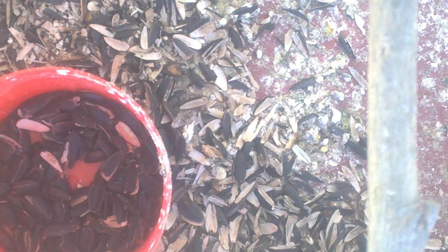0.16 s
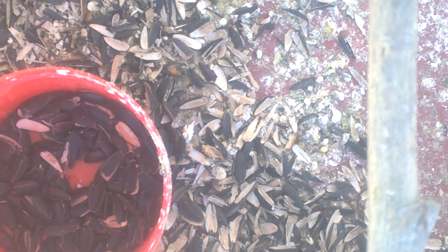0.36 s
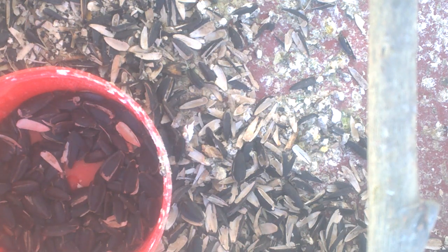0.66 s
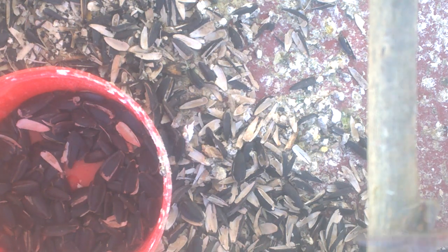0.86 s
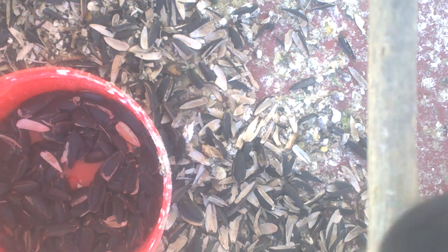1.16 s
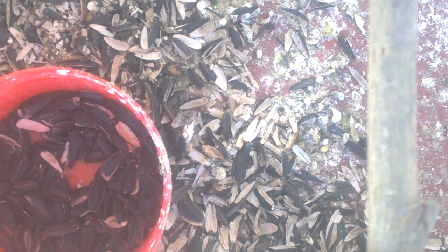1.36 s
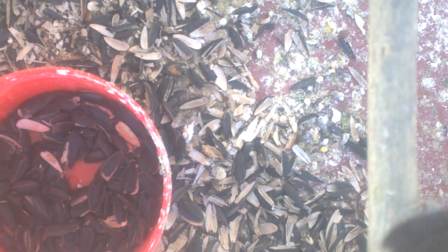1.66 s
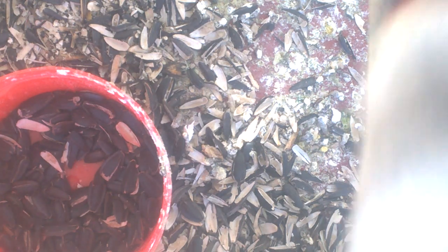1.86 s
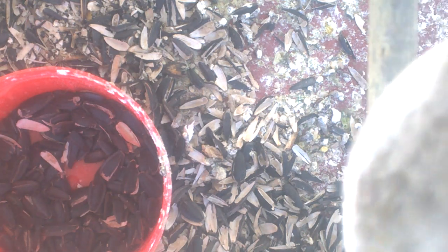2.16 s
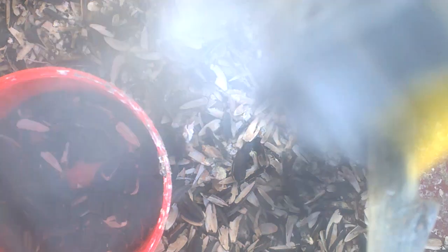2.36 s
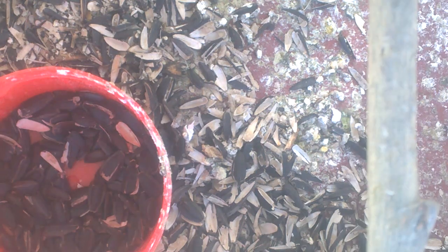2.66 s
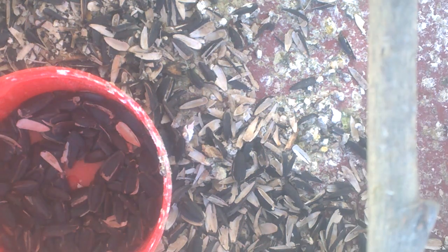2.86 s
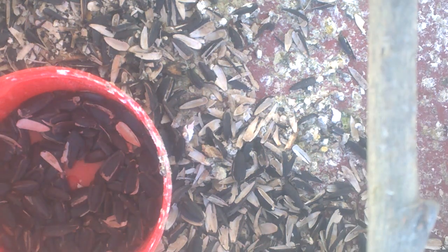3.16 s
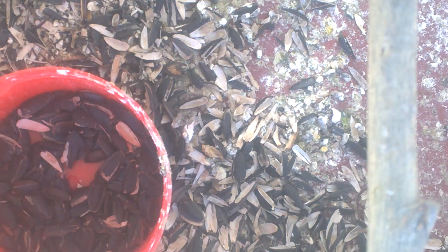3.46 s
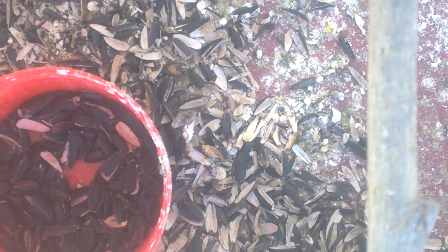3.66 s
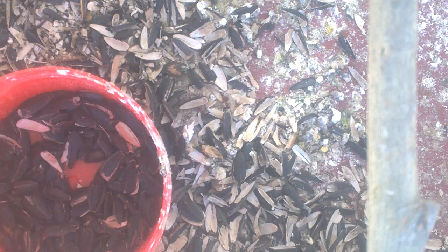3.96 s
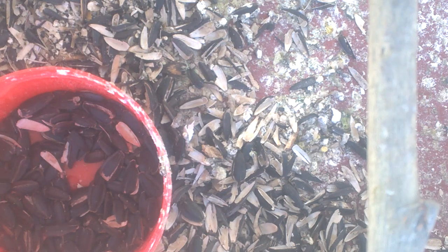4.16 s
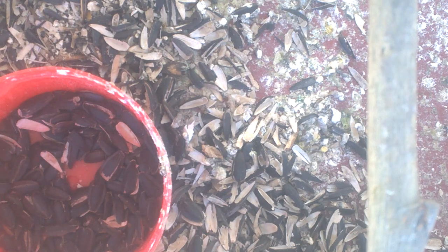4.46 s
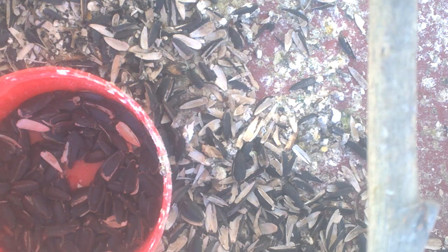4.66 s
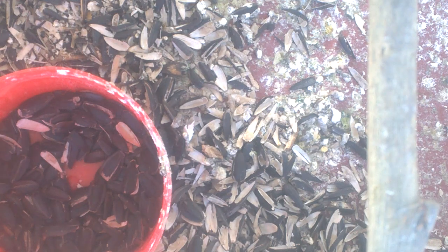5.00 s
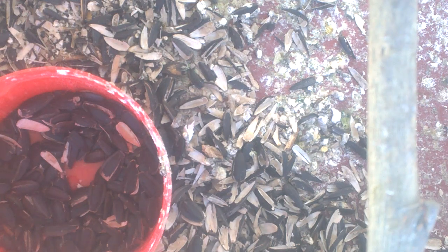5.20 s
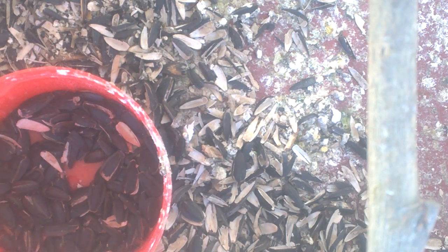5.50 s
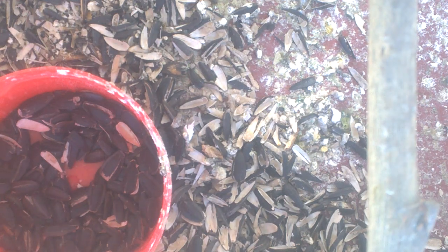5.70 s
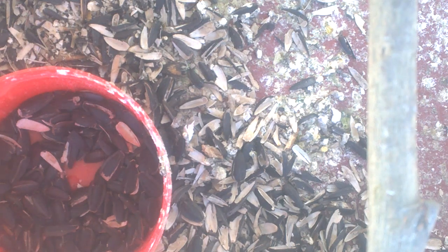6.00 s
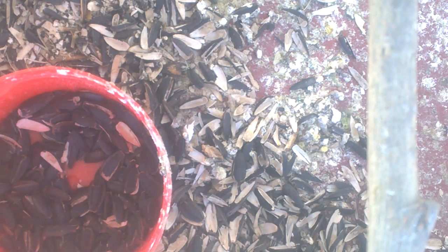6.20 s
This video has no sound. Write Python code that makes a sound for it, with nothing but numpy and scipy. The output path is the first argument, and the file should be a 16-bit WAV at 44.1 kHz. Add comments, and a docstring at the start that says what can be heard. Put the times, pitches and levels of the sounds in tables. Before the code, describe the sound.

Close outdoor sound from a microphone in a feeder: irregular hard taps, scratchy claw contacts and a few wing beats ring the boards, with short gaps between clusters. Low wind buffeting comes and goes, strongest at the start and in a burst of thumps near the end. A distant farm animal bleats first and again at the cut-off. Three very short, high chirps pierce the soft air.

```python
"""A microphone inside a wooden bird feeder on a farm, with soft air and a faint thin tone behind everything.
At once a farm animal bleats some way off: vocal-fold pulses and swelling breath noise through a throat.
Wind buffets the microphone from the start, again and again: noise rumble, flutter and pressure dips for eddies.
From 0.3 s small birds hop, peck and beat their wings close by: contacts ring the boards. A bird chirps a rising
whistle after one second and near 2.5 s; strong eddies come near 5.8 s, a second bleat and third chirp at 6.1 s."""
import sys
import numpy as np
from scipy import signal
from scipy.fft import rfft, irfft
from scipy.io import wavfile

SR = 44100
rng = np.random.default_rng(int(sys.argv[2]) if len(sys.argv) > 2 else 0)


def unload_wav(signal):
    """Save mono or channel-first audio to the path in sys.argv[1] as 16-bit WAV at rate SR, clipped to [-1, 1]."""
    wavfile.write(
        sys.argv[1],
        SR,
        np.round(np.clip(np.atleast_2d(signal).T, -1, 1) * 32767).astype(np.int16),
    )


N = 279594
TIME = np.arange(N) / SR


def amp(db):
    """Decibels to gain."""
    return 10 ** (np.asarray(db) / 20)


def rms_one(x):
    """Scale to unit rms."""
    return x / np.sqrt(np.mean(x ** 2) + 1e-20)


def columns(rows, t):
    """Join the table columns by straight lines, read at the times t."""
    start, *rest = np.transpose(rows)
    return [np.interp(t, start, column) for column in rest]


def drift(rate_hz, size):
    """Random wandering of unit rms: white noise through a double-pole low-pass."""
    r = np.exp(-2 * np.pi * rate_hz / SR)
    settle = 20000   # samples dropped while the filter settles
    noise = rng.standard_normal(size + settle)
    return rms_one(signal.lfilter([1], [1, -2 * r, r * r], noise)[settle:])


def resonate(x, hz, width_hz):
    """Two-pole resonance, gain about 1 at its peak."""
    r = np.exp(-np.pi * width_hz / SR)
    zeros = np.array([1, 0, -1]) * (1 - r * r) / 2
    poles = [1, -2 * r * np.cos(2 * np.pi * hz / SR), r * r]
    return signal.lfilter(zeros, poles, x)


def coloured(spectrum):
    """Unit-rms noise whose spectrum follows the table, joined along log frequency."""
    hz = np.maximum(np.fft.rfftfreq(N, 1 / SR), 1)
    table_hz, table_db = np.transpose(spectrum)
    gain = amp(np.interp(np.log(hz), np.log(table_hz), table_db))
    return rms_one(irfft(rfft(rng.standard_normal(N)) * gain, N))


# spectrum of the open air around the feeder: frequency_hz [Hz], density_db [dB per Hz, relative]
AIR_SPECTRUM = [(71, -35), (120, -2.5), (235, 0), (398, -3.5), (530, -11.5), (649, -11), (719, -10),
                (1320, -13), (2160, -21.5), (3890, -21.5), (5610, -23), (7450, -29), (15500, -27)]
AIR_DB = -68   # rms level


def air():
    """The soft steady air of the place: noise shaped by its spectrum."""
    return amp(AIR_DB) * coloured(AIR_SPECTRUM)


# faint thin tone: start_s [s], pitch_hz [Hz], level_db [dB rms]
FAINT_TONE = [(0, 649.5, -74.5), (1.5, 658.3, -76), (4, 641, -79.5), (4.6, 655.6, -83), (6.34, 642, -86)]


def faint_tone():
    """A thin sine that slides slowly in pitch and wavers slightly in level."""
    pitch_hz, level_db = columns(FAINT_TONE, TIME)
    phase = 2 * np.pi * np.cumsum(pitch_hz) / SR
    return np.sqrt(2) * amp(level_db + 0.25 * drift(11, N)) * np.sin(phase)


# rise and fall of the wind at the microphone: start_s [s], rumble_db [dB, before the lumps]
WIND_LEVEL = [(0.0, -35.5), (0.56, -50), (0.88, -41), (1.08, -60), (1.34, -46), (1.6, -55), (1.91, -48.5),
              (2.17, -47.5), (2.42, -63.5), (2.9, -49.5), (3.25, -60.5), (3.62, -55), (3.89, -48),
              (4.31, -47.5), (4.5, -54), (4.96, -48), (5.35, -59), (6.34, -58)]
# spectrum of the wind rumble: frequency_hz [Hz], density_db [dB per Hz, relative]
RUMBLE_SPECTRUM = [(15, 9), (30, 9), (50, 7), (80, -3), (120, -13.5), (200, -61.5)]
FLUTTER_DB, FLUTTER_FOLLOWS = -68.5, 0.24   # level at mean rumble; share of the rumble's dB swing


def wind():
    """Turbulent air on the microphone: deep rumble and a faster flutter, both made lumpy."""
    rumble_db, = columns(WIND_LEVEL, TIME)
    flutter_db = FLUTTER_DB + FLUTTER_FOLLOWS * (rumble_db - rumble_db.mean())
    rumble = coloured(RUMBLE_SPECTRUM)
    flutter = resonate(rng.standard_normal(N), 110, 110)
    flutter = rms_one(resonate(flutter, 110, 200))
    lumps = amp(1.7 * drift(31.5, N))
    return lumps * (amp(rumble_db) * rumble + amp(flutter_db) * flutter)


# strong eddies at the microphone: centre_s [s], depth_db [dB, scale of the dip], width_ms [ms, time scale]
EDDIES = [(0.113, -37, 13), (0.206, -36, 3.2), (0.287, -42, 9.9), (0.467, -26.5, 9.5), (0.485, -31, 14),
          (0.505, -29.5, 10.5), (0.556, -27.5, 6.5), (0.909, -26, 15.3), (0.985, -39, 4),
          (1.009, -30.5, 11.7), (1.405, -38, 8.3), (1.741, -36.5, 15.5), (1.851, -29.5, 3.7),
          (1.866, -32, 4), (1.885, -34, 15.5), (1.919, -37, 2.2), (1.931, -31.5, 8), (1.954, -33, 6.3),
          (2.461, -24.5, 10.1), (2.743, -37.5, 14), (2.957, -37.5, 16.6), (3.495, -26, 10.4),
          (4.091, -40.5, 13.6), (4.156, -36, 4.8), (4.223, -39, 4.4), (4.296, -33.5, 8.7),
          (4.324, -32, 7.3), (4.35, -36, 10), (4.956, -36.5, 10.5), (5.01, -36, 11), (5.732, -20.5, 10.9),
          (5.775, -21.5, 12), (5.817, -21, 13), (5.861, -17, 9.5)]
TEAR_DB, TEAR_DB_PER_MS = -28.5, -0.51   # tearing against depth: narrow eddies tear more


def eddies():
    """Each strong eddy is a pressure dip with a swell before and after, and a little tearing noise."""
    out = np.zeros(N)
    tearing = resonate(rng.standard_normal(N), 135, 270)
    tearing = rms_one(resonate(tearing, 120, 280))
    for centre_s, depth_db, width_ms in EDDIES:
        u = (TIME - centre_s) / (width_ms / 1000)   # time in eddy widths
        pressure = -np.exp(-(u / 0.4) ** 2)
        pressure += 0.52 * np.exp(-((u + 1.0) / 0.51) ** 2)   # swell before
        pressure += 0.55 * np.exp(-((u - 1.4) / 0.8) ** 2)   # swell after
        tear_gain = amp(TEAR_DB + TEAR_DB_PER_MS * width_ms)
        out += amp(depth_db) * (pressure + tear_gain * tearing * np.exp(-(u / 2.0) ** 2))
    return out


def add(out, start_s, x):
    """Mix x in at start_s, cut at the end of the scene."""
    i = round(start_s * SR)
    out[i:i + len(x)] += x[:N - i]


# one list per bleat: start_s [s], pitch_hz [Hz], level_db [dB, upper throat], noise_share [0-1]
BLEATS = [
    [(0.004, 114.7, -63, .5), (0.06, 126.2, -61, 0.7), (0.148, 135.4, -54, 0.23), (0.24, 144.7, -52.5, 0.4),
     (0.43, 148.6, -53.5, 0.46), (0.55, 145.3, -52, 0.03), (0.6, 141.7, -52.5, 0.2),
     (0.675, 146.5, -54.5, 0.39), (0.72, 141, -57, 0.5), (0.77, 140.5, -73, 0.53)],
    [(6.1, 117.8, -92, 1), (6.14, 125.2, -65, 0.94), (6.196, 130.9, -55.5, 0.12), (6.26, 134, -55, 0),
     (6.295, 142, -53, 0.3), (6.34, 145.7, -50, 0.15)],
]
# lower throat resonances of each bleat: level_db [dB against the bleat's level]
LOW_THROAT_DB = [-5, 1]
# throat resonances, low to high: frequency_hz [Hz], width_hz [Hz, first pass], level_db [dB, within its group]
THROAT = [(326, 205, -9), (611, 118, 0), (937, 220, 1), (1334, 200, 4.5), (1500, 210, 6), (1812, 124, 5.5),
          (2200, 260, -13)]
FUNDAMENTAL_DB = -1   # rms against the bleat's level
# the mouth opens as the pitch climbs and lets the top resonances out
OPEN_HZ, TOP_DB, TOP_DB_PER_HZ = 151, 1, 0.57   # at OPEN_HZ their extra gain is TOP_DB


def bleat(rows, low_db):
    """Vocal-fold pulses plus breath noise that swells slightly each cycle, through the throat; a clean fundamental."""
    t = np.arange(rows[0][0], rows[-1][0], 1 / SR)
    pitch_hz, level_db, noise_share = columns(rows, t)
    noise_share = np.clip(noise_share, 0, 1)
    unsteady_hz = pitch_hz * (1 + 0.01 * drift(33, len(t)))
    phase = 2 * np.pi * np.cumsum(unsteady_hz) / SR
    # each partial fades in and out on its own on the way through moving air
    pulses = sum(amp(3.2 * drift(12, len(t))) * np.cos(k * phase) for k in range(2, 20))
    breath = rng.standard_normal(len(t)) * (1 + 0.22 * np.cos(phase))
    breath = signal.sosfilt(signal.butter(2, 2800, fs=SR, output="sos"), breath)
    source = np.sqrt(1 - noise_share) * rms_one(pulses) + np.sqrt(noise_share) * rms_one(breath)

    bands = []
    for hz, width_hz, band_db in THROAT:
        band = resonate(resonate(source, hz, width_hz), hz, 1.37 * width_hz)
        bands.append(amp(band_db) * band)
    low = rms_one(bands[0] + bands[1])
    top_gain = amp(TOP_DB + TOP_DB_PER_HZ * (pitch_hz - OPEN_HZ))
    high = rms_one(bands[2] - bands[3] + bands[4] - top_gain * (bands[5] - bands[6]))
    fundamental = amp(FUNDAMENTAL_DB) * np.sqrt(2) * np.sin(phase)
    fade = np.clip(np.minimum(t - t[0] + 0.009, t[-1] - t + 0.011) / 0.023, 0, 1)
    return fade * amp(level_db) * (high + amp(low_db) * low + fundamental)


def bleats():
    """The farm animal's two bleats, each at its own time."""
    out = np.zeros(N)
    for rows, low_db in zip(BLEATS, LOW_THROAT_DB):
        add(out, rows[0][0], bleat(rows, low_db))
    return out


# chirps of the bird: start_s [s], peak_db [dB, before the waver], pitch_factor [ratio]
CHIRPS = [(1.052, -39.5, 1.0), (2.4855, -37, 1.015), (6.121, -41.5, 1.012)]
# course of one chirp: time_ms [ms], pitch_hz [Hz, before pitch_factor], level_db [dB against the peak]
CHIRP_SHAPE = [(0, 2400, -28), (2, 2900, -21), (5, 3330, -14), (7.5, 3700, 0), (10, 4200, -3),
               (12.5, 4530, -7), (17.5, 4500, -13), (19, 4450, -35)]
# second and third partial of the whistle: level_db [dB against the first]
OVERTONES_DB = [-30, -38]
# faint blurred tail just after each chirp: delay_ms [ms], level_db [dB against the chirp, before the wander]
CHIRP_TAIL = [(11, -30), (17, -31), (24, -33), (33, -36)]


def chirps():
    """A rising whistle with weak overtones; faint copies, wandering in strength and sign, blur into a tail."""
    out = np.zeros(N)
    t = TIME[:int(CHIRP_SHAPE[-1][0] * SR / 1000)]
    pitch_hz, shape_db = columns(CHIRP_SHAPE, t * 1000)
    for start_s, peak_db, pitch_factor in CHIRPS:
        phase = 2 * np.pi * np.cumsum(pitch_hz * pitch_factor) / SR
        whistle = np.sin(phase)
        for partial, overtone_db in enumerate(OVERTONES_DB, start=2):
            whistle += amp(overtone_db) * np.sin(partial * phase)
        whistle *= amp(peak_db + shape_db + 1.6 * drift(130, len(t)))
        add(out, start_s, whistle)
        for delay_ms, tail_db in CHIRP_TAIL:
            add(out, start_s + delay_ms / 1000, whistle * amp(tail_db) * drift(270, len(t)))
    return out


BLOW = 16.3   # first contact, against the rms of the rattle before its swings


def rattle(size):
    """One sharp push, then small random contacts over noise, swinging unevenly in level."""
    contacts = (rng.random(size) < 700 / SR) * rng.uniform(-1, 1, size)   # about 700 a second
    rough = rms_one(rms_one(contacts) + 0.58 * rng.standard_normal(size))
    drive = rough * amp(1.82 * drift(50, size))
    drive[0] = BLOW
    return drive


# claws, beaks and a few wing beats at the boards, close by: start_s [s], level_db [dB, drives the floor],
# then against level_db: thud_db [dB], box_db [dB], hardness_db [dB, drives the wall], rim_db [dB]
KNOCKS = [(0.324, -54.5, -1.5, -8, -9, -15), (0.477, -56, -21, -16, -11, -13),
          (0.722, -54, -2.5, -6.5, -7, -8.5), (0.895, -81.5, 16, 0, 13, 5),
          (0.95, -53, 2.5, -7, -11.5, -11.5), (0.964, -43.5, -6, -12, -15, -27),
          (0.984, -52.5, -25, 3.5, -14, -16), (1.13, -64, -11, -10, -6, -13), (1.152, -65, 7, -8, -11, -30),
          (1.203, -50.5, -20, 1, -9, -15), (1.225, -56.5, -20, -6, -7, -23), (1.324, -65, -5, 6, 0.5, -3.5),
          (1.433, -58.5, -10, 2, -4, -5), (1.463, -62.5, -5, 5, -1, 0), (2.269, -65, -25, -8.5, -7, -17),
          (2.356, -55, -9, 4.5, -1, -3.5), (2.434, -57.5, 6.5, -18, -6, -8),
          (2.448, -54, -8.5, -14, -5, -8.5), (2.715, -53.5, -1, -10, -5, -6.5),
          (2.858, -56, 0.5, -13, -8.5, -17), (2.909, -60.5, 1.5, -11, -10, -29),
          (2.95, -64, -12, -13, -8, -24), (3.397, -65.5, -1, -4, -10, -14), (3.481, -78, 1, 7, 2, -5),
          (4.098, -54.5, -12.5, -12, -20, -14), (4.114, -54, -22, -12, -5.5, -6.5),
          (4.3, -53.5, -1, 0, -5.5, -10.5), (4.33, -51.5, -17, -2, -22, -20),
          (4.354, -54.5, -7, 0, -17, -20), (4.465, -59.5, -4, 3, -3, -11.5),
          (4.489, -54, -16, -5, -16, -19), (4.567, -51.5, -6, -1.5, -0.5, -7),
          (4.61, -53.5, -11, 1, -3, -5.5), (4.707, -58, -31, 0, -0.5, -9), (5.12, -59, -0.5, -7, -10, -16),
          (5.619, -61.5, -5.5, -3, -5.5, -19), (5.65, -63, -12, -11, -16, -26),
          (5.725, -58, -15, 1, -0.5, -5), (5.736, -64.5, 1, -1.5, 4, -1),
          (5.837, -50.5, -1, -18, -5.5, -7.5), (5.85, -50, -7, -16, -4, -12.5),
          (5.876, -56.5, -9, -14, -7, -18), (5.969, -77, 18.5, 4, -0.5, 8),
          (6.102, -55.5, -7, -13, -6, -16), (6.129, -53, -6, -13, -16, -26)]
# resonances, one list each for thud, box, floor, wall, rim and crack:
# frequency_hz [Hz], width_hz [Hz, first pass], level_db [dB, before a random spread]
BOARDS = [
    [(232.5, 55, -5.5)],
    [(358.3, 75, -5.5), (455, 38, -10)],
    [(672, 83, -15.5), (877.4, 63, -8), (970, 91, -7.5), (1124, 113, -11)],
    [(1249, 84, -8.5), (1308, 190, -8.5)],
    [(1897, 100, -13.5), (2085, 180, -7.5), (2540, 490, -12)],
    [(3670, 700, -3.5), (4930, 1600, -5), (8800, 6000, -11)],
]
RATTLE_S, KNOCK_T60_S = 0.011, 0.16   # hold, then fall by 60 dB, both at 1 kHz
TAIL_DB, TAIL_T60_S = -18, 0.74   # the boards shiver on faintly; T60 at 1 kHz
CRACK_DB, CRACK_FOLLOWS = -16.5, 1.28   # crack at hardness 0 dB; dB of crack per dB of hardness


def knocks():
    """A blow and the uneven rattle after it drive the board resonances; higher ones die sooner."""
    out = np.zeros(N)
    t = TIME[:int(0.35 * SR)]
    for start_s, level_db, thud_db, box_db, hardness_db, rim_db in KNOCKS:
        crack_db = CRACK_DB + CRACK_FOLLOWS * hardness_db
        parts_db = level_db + np.array([thud_db, box_db, 0, hardness_db, rim_db, crack_db])
        contacts = rattle(len(t))
        for part_db, modes in zip(parts_db, BOARDS):
            for hz, width_hz, mode_db in modes:
                time_scale = (1000 / hz) ** 0.3
                after_hold = np.maximum(t - RATTLE_S * time_scale, 0)
                dying = amp(-60 * after_hold / (KNOCK_T60_S * time_scale))
                tail = amp(TAIL_DB - 60 * t / (TAIL_T60_S * time_scale))
                # the square root evens out the noise power that narrow and wide resonances let through
                ring = resonate(contacts * (dying + tail), hz, width_hz) * np.sqrt(SR / width_hz)
                for _ in range(2):   # steeper skirts
                    ring = resonate(ring, hz, 3.15 * width_hz)
                add(out, start_s, amp(part_db + mode_db + rng.normal(0, 1.5)) * ring)
    return out


def scene():
    """All sources, summed at one microphone."""
    out = air() + faint_tone() + wind() + eddies() + bleats() + chirps() + knocks()
    return out[None]


CUTOFF_HZ = 15950   # stop-band edge of the top cut


def record(dry):
    """The microphone loses the deepest bass, below about 12 Hz; the top is cut steeply."""
    x = signal.sosfilt(signal.butter(1, 12, "high", fs=SR, output="sos"), dry)
    return signal.sosfilt(signal.cheby2(16, 60, CUTOFF_HZ, fs=SR, output="sos"), x)


dry = scene()
out = record(dry)
unload_wav(out)
```